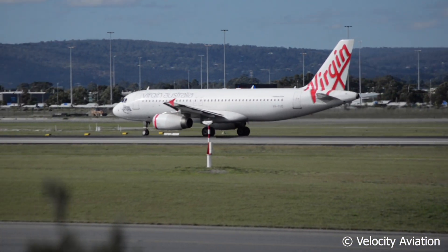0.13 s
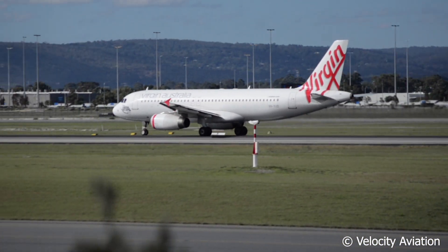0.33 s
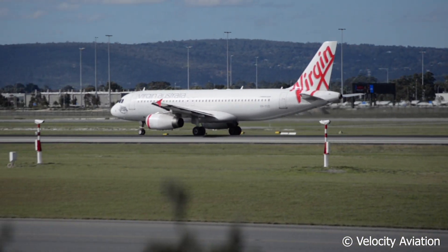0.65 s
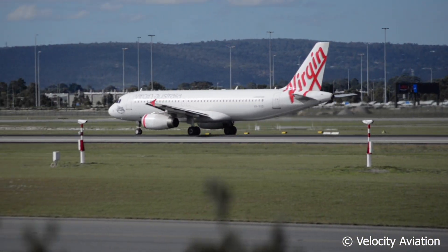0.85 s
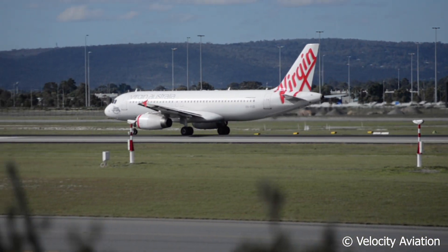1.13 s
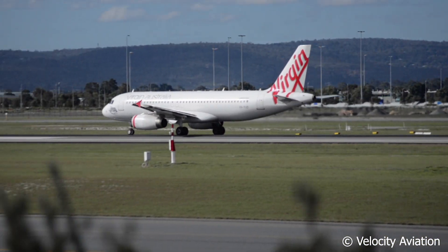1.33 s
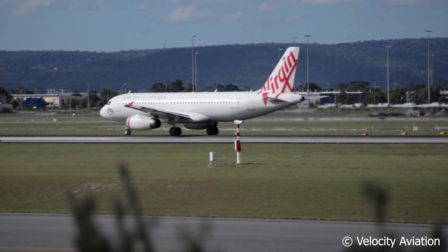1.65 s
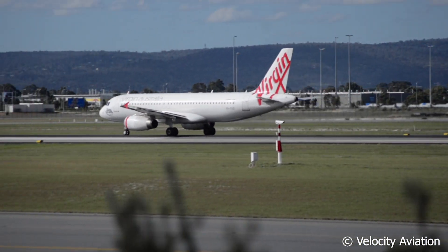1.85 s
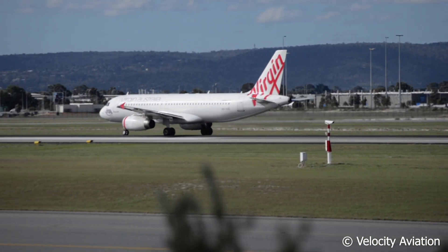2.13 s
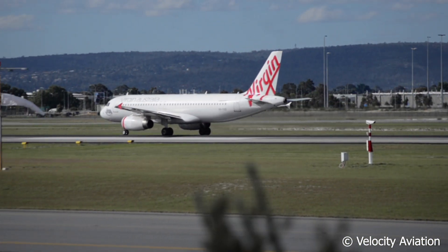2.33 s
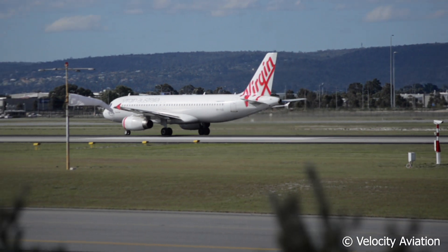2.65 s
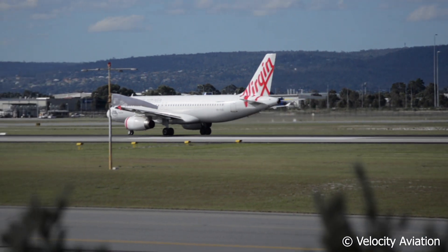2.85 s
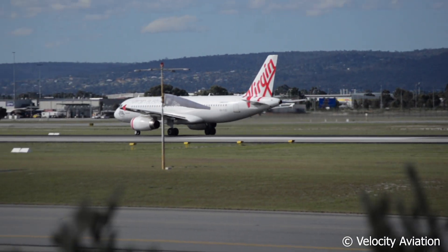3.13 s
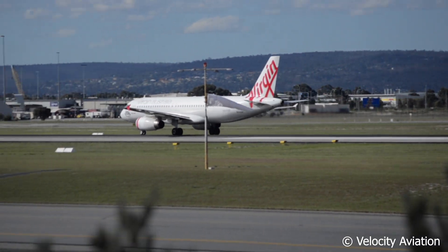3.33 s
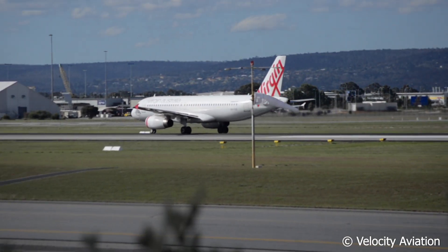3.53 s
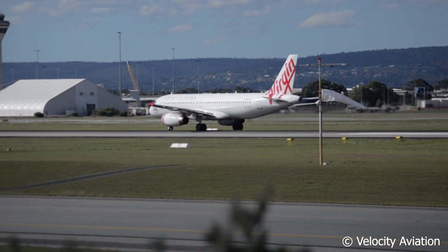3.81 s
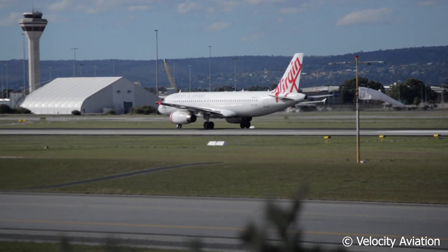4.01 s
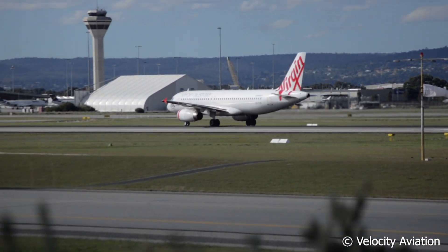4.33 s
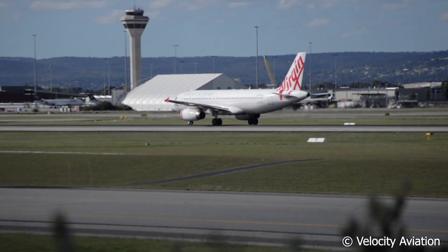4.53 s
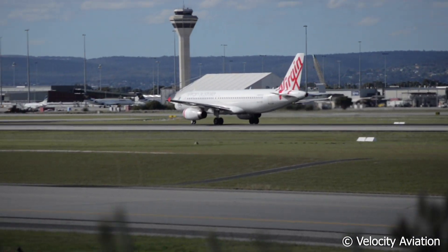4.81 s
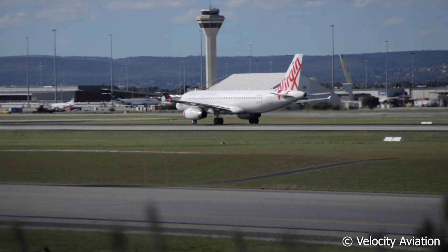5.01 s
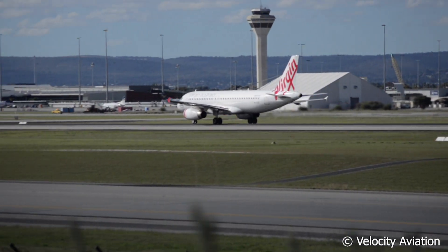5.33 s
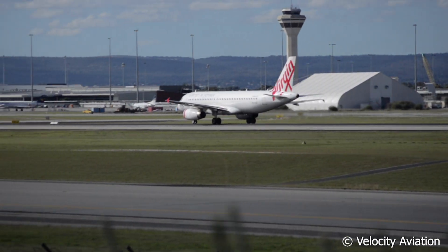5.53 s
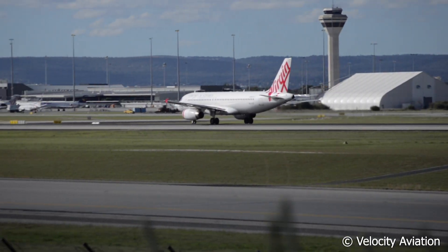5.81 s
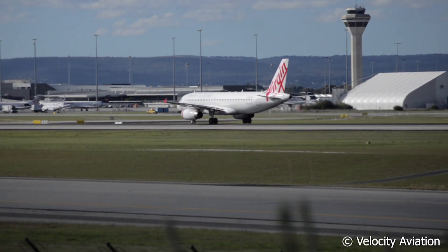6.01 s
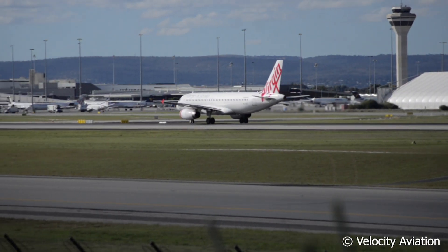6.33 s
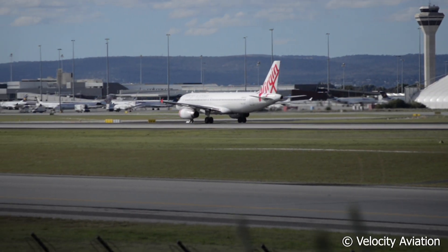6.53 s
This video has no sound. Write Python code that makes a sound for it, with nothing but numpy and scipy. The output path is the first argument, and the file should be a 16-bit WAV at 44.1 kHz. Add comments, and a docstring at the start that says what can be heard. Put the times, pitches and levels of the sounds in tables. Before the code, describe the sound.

A twin-engine jet airliner rolls away down a runway, heard from a distance across a wide grass field. A deep, muffled rumble is there from the start and dominates throughout. Above it, a softer roar and an airy engine hiss swell and sink unevenly, as if carried on moving air. A faint, high fan whine flickers through the first second, then fades, and the roar flares briefly at about 0.5 seconds. The rumble dips slightly near 2 seconds, then gives a short, louder bump just before 3 seconds. After that the sound is a little duller, with the engine hiss gradually weakening and the roar rising gently around 5 seconds. The roar surges once more just after 6 seconds and eases, with the rumble still going at the end, near 6.7 seconds. Faint, steady microphone hiss lies under everything.

```python
"""A twin-engine airliner rolls away down a runway, heard across a wide grass field.
From the start its exhaust eddies rumble, and the grass swallows the sound above a few hundred hertz.
Over that gap, jet roar and fan hiss swell and sink as turbulent air bends their path. A fan blade tone
pokes through in the first second, then fades. The rumble bumps up near 3 s, and the roar surges once
more just after 6 s. Microphone hiss lies under it all."""
import sys
import numpy as np
from scipy import signal
from scipy.fft import rfft, irfft, next_fast_len
from scipy.io import wavfile
from scipy.ndimage import uniform_filter1d, map_coordinates

SR = 44100
rng = np.random.default_rng(int(sys.argv[2]) if len(sys.argv) > 2 else 0)


def digitize_waveform(pressure):
    """Quantize a signal to 16-bit integers and store it at the path in sys.argv[1].

    Rows of a 2-D input are taken as channels; values are limited to [-1, 1].
    """
    field = np.atleast_2d(pressure).T
    bounded = np.clip(field, -1, 1)
    quanta = np.round(bounded * 32767).astype(np.int16)
    wavfile.write(sys.argv[1], SR, quanta)


N = 293706

# Level ride of the exhaust heard along the ground: time_s, rumble_db, upper_rumble_db
EXHAUST_LEVELS = [(0, -21.5, -25.5), (.95, -19.5, -28.5), (1.35, -19.5, -26), (1.9, -26, -27),
                  (2.2, -22.5, -35.5), (2.5, -21.5, -29), (2.76, -22.5, -30.5), (2.85, -14, -32),
                  (3.0, -21.5, -34), (3.6, -20.5, -36), (3.95, -22, -32), (4.35, -21.5, -38.5),
                  (5.35, -20.5, -31), (5.75, -22, -30), (6.05, -19, -27.5), (6.4, -22, -32.5),
                  (6.66, -22.5, -34)]
# Tone of the rumble's deep body and of its upper band: frequency_hz, density_db
RUMBLE_EQ = [(13, -60), (22, -41.5), (62, -8), (103, 2), (162, -0.5), (230, -14), (300, -38), (510, -120)]
UPPER_RUMBLE_EQ = [(110, -32.5), (190, -2.5), (229, -3.5), (355, -16.5), (430, -25.5), (560, -49),
                   (950, -120)]


def exhaust_rumble():
    """Large eddies of both jets; the upper band comes and goes with the damping of the grass."""
    rumble_db, upper_db = envelopes(EXHAUST_LEVELS)
    body = amp(rumble_db) * noise_bed(RUMBLE_EQ, patchy_db=0.71)
    upper = amp(upper_db) * noise_bed(UPPER_RUMBLE_EQ, patchy_db=1.6)
    return body + upper


# Swells of roar that turbulent air carries over the grass: time_s, high_roar_db
ROAR_SWELLS = [(0, -41), (.3, -41.5), (.57, -38), (1.1, -44.5), (1.5, -44), (1.95, -47.5), (2.3, -43.5),
               (2.95, -41), (3.3, -46.5), (3.6, -46), (4.1, -44), (4.5, -44.5), (5.3, -43), (5.7, -47),
               (6.12, -40), (6.38, -41), (6.66, -44)]
# Tone of the low roar, the high roar and the fan hiss: frequency_hz, density_db
LOW_ROAR_EQ = [(230, -29.5), (390, -1.5), (594, -1.5), (800, -12), (1040, -33), (1760, -120)]
HIGH_ROAR_EQ = [(420, -33), (720, -2), (1090, -3.5), (1490, -8), (1740, -7.5), (2000, -16.5), (2600, -35),
                (4400, -120)]
FAN_HISS_EQ = [(1100, -26), (1900, -1), (2400, -1.5), (2900, -7), (3300, -10), (3800, -19.5), (4500, -25.5),
               (5500, -31), (7000, -39), (10000, -68)]


def engine_roar():
    """Fine jet turbulence and fan noise, dulled by the long air path; one swell drives all three bands."""
    t = np.arange(N) / SR
    high_db, = envelopes(ROAR_SWELLS)
    mean_db = high_db.mean()
    swell_db = high_db - mean_db
    upper_rumble_db = envelopes(EXHAUST_LEVELS)[1]
    grass_db = upper_rumble_db - upper_rumble_db.mean()
    low_db = mean_db + 1.15 + 0.8 * swell_db + 0.41 * grass_db  # partly follows the grass damping
    fade_db_per_s = 0.69  # the fan hiss fades as the air path grows
    fan_db = mean_db - 4 + 0.5 * swell_db - fade_db_per_s * t
    low = amp(low_db) * noise_bed(LOW_ROAR_EQ, patchy_db=1.1)
    high = amp(high_db) * noise_bed(HIGH_ROAR_EQ, patchy_db=1.52)
    fan = amp(fan_db) * noise_bed(FAN_HISS_EQ, patchy_db=1.25)
    return low + high + fan


# Accents in the roar: peak_s, peak_db, decay_s, centre_hz
FLARES = [(0.28, -44.5, 0.12, 2760), (0.53, -38.5, 0.22, 600), (0.62, -49.5, .2, 2700),
          (2.2, -52.5, .7, 2400), (5.03, -53.5, .12, 2610), (6.2, -41, 0.27, 900)]
# Band shape of one accent: ratio_to_centre, density_db
FLARE_EQ = [(.45, -60.5), (.75, -3.5), (1.05, 1), (1.28, -6.5), (1.55, -30), (2.4, -120)]


def roar_flares():
    """Short swells in one band of the roar: a quick attack, a slower decay."""
    t, out = np.arange(N) / SR, np.zeros(N)
    for peak_s, peak_db, decay_s, centre_hz in FLARES:
        attack_s = 0.12 * decay_s
        envelope = np.exp(-np.abs(t - peak_s) / np.where(t < peak_s, attack_s, decay_s))
        band = [(ratio * centre_hz, db) for ratio, db in FLARE_EQ]
        out += amp(peak_db) * envelope * noise_bed(band, patchy_db=0.0)
    return out


# The blade tone pokes through the fan hiss: peak_s, peak_db, width_s
BLADE_SWELLS = [(0.05, -59, .1), (0.27, -58, .1), (0.62, -57.5, .11), (0.79, -60.5, .2)]


def blade_tone(pitch_hz=3248, base_db=-68, fade_db_per_s=6.5):
    """The fan's blade tone flickers in level and pitch on its way through moving air."""
    t = np.arange(N) / SR
    level = amp(base_db - fade_db_per_s * t)
    for peak_s, peak_db, width_s in BLADE_SWELLS:
        level += amp(peak_db) * np.exp(-.5 * (2 * (t - peak_s) / width_s) ** 2)
    drift_hz = 11 * wobble(40)
    phase = 2 * np.pi * np.cumsum(pitch_hz + drift_hz) / SR
    flicker_db = 2.2 * wobble(18)
    return np.sqrt(2) * level * amp(flicker_db) * np.sin(phase)


def noise_bed(eq, patchy_db):
    """Coloured noise at rms 1; random patches of about 250 Hz by 0.3 s lift and drop, as in eddying air."""
    spectrogram = signal.stft(rng.standard_normal(N + 1024), nperseg=1024)[2]
    patches = rng.standard_normal(spectrogram.shape)
    for _ in range(2):
        patches = uniform_filter1d(patches, size=4, axis=0)  # across frequency
        patches = uniform_filter1d(patches, size=17, axis=1)  # across time
    noise = signal.istft(spectrogram * amp(patchy_db * unit_rms(patches)), nperseg=1024)[1][:N]
    eq_hz, eq_db = np.transpose(eq)
    response = lambda hz: amp(np.interp(np.log(hz + 1), np.log(eq_hz + 1), eq_db))
    return unit_rms(filtered(noise, response))


def filtered(x, response):
    """x through an EQ whose gain is response(hz)."""
    size = next_fast_len(N + 8192)
    return irfft(rfft(x, size) * response(np.fft.rfftfreq(size, 1 / SR)), size)[..., :N]


def envelopes(rows):
    """One value per sample for each column after the time."""
    time_s, *columns = np.transpose(rows)
    return [np.interp(np.arange(N) / SR, time_s, column) for column in columns]


def wobble(knots_per_s):
    """A smooth random modulation curve."""
    knots = rng.standard_normal(int(N * knots_per_s / SR) + 4)
    return map_coordinates(knots, [np.arange(N) * knots_per_s / SR])


def amp(db):
    """Gain of a level in dB."""
    return 10 ** (np.asarray(db) / 20)


def unit_rms(x):
    """x at rms 1."""
    return x / np.sqrt(np.mean(x ** 2) + 1e-20)


def scene():
    """The airliner's layers, mixed to mono."""
    return (exhaust_rumble() + engine_roar() + blade_tone() + roar_flares())[None]


# Tone of the microphone's nearly white noise floor: frequency_hz, density_db
MIC_HISS_EQ = [(20, 0), (6000, 0.5), (10000, -1), (16000, -0.17)]


def record(dry):
    """The microphone adds its steady hiss, rolls off the deep bass and cuts the very top."""
    hiss_db, low_cut_hz, high_cut_hz = -67.5, 40, 15750
    hiss = amp(hiss_db) * noise_bed(MIC_HISS_EQ, patchy_db=1.2)
    low_cut = lambda hz: 1 / np.sqrt(1 + (low_cut_hz / (hz + 1)) ** 4)
    return filtered(dry + hiss, lambda hz: low_cut(hz) * (hz < high_cut_hz))


dry = scene()
out = record(dry)
digitize_waveform(out)
```